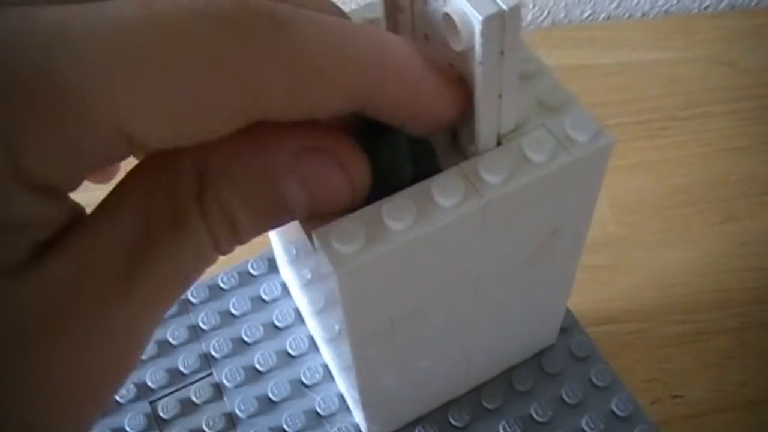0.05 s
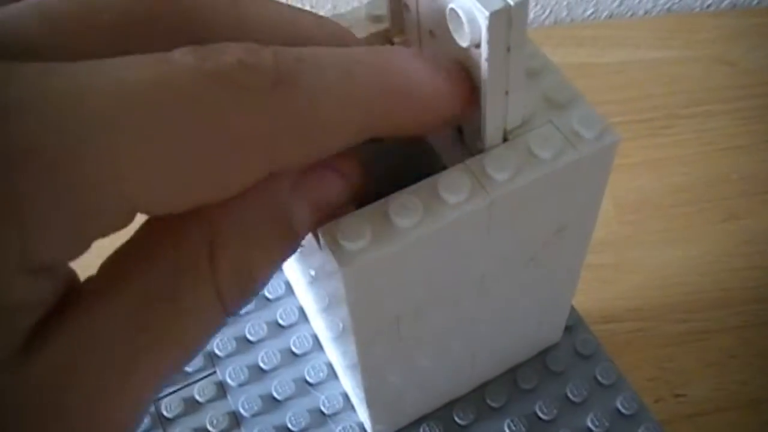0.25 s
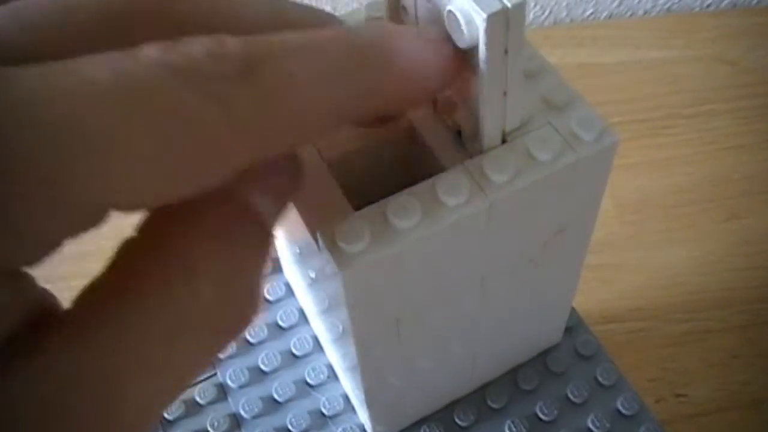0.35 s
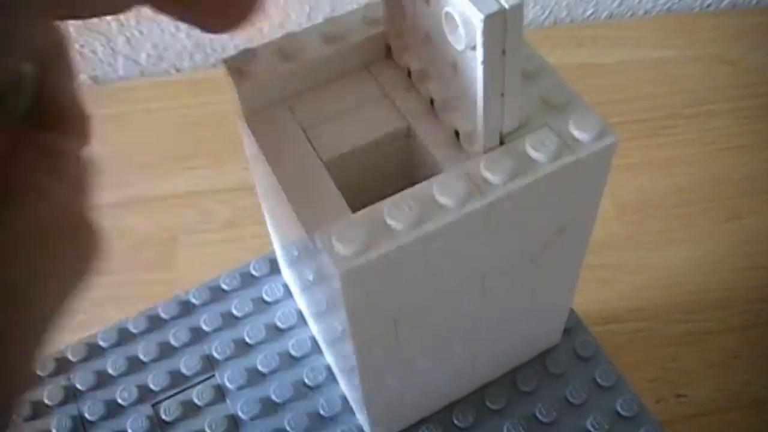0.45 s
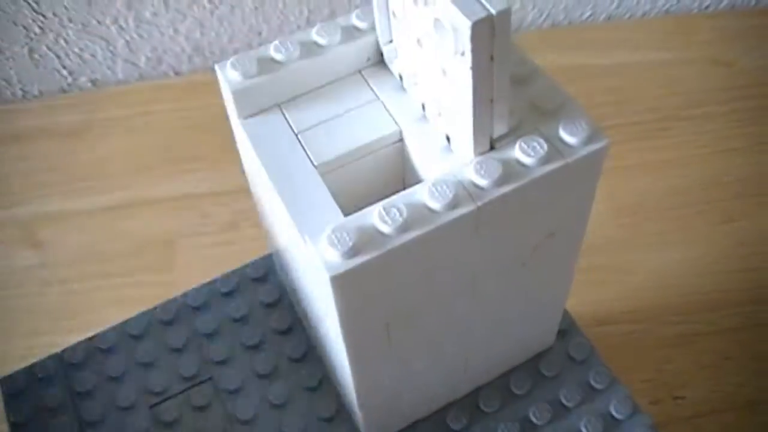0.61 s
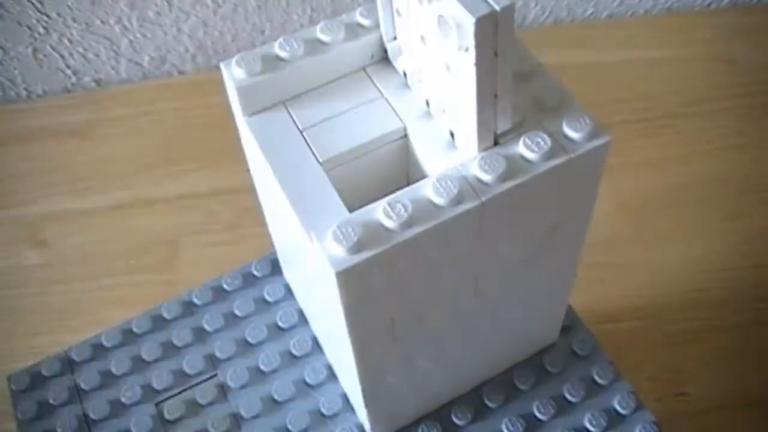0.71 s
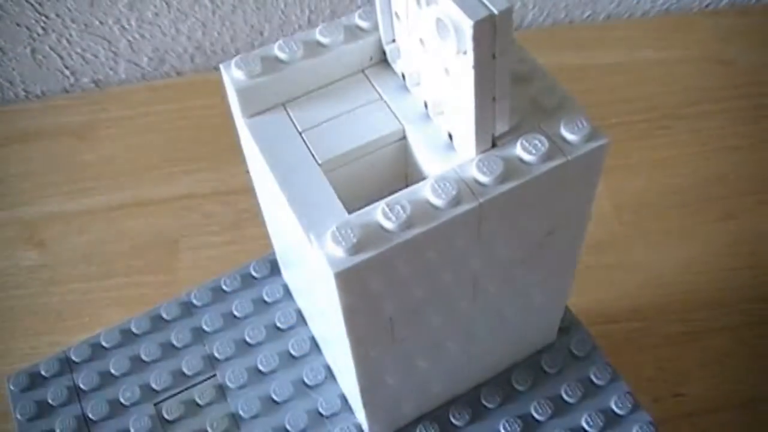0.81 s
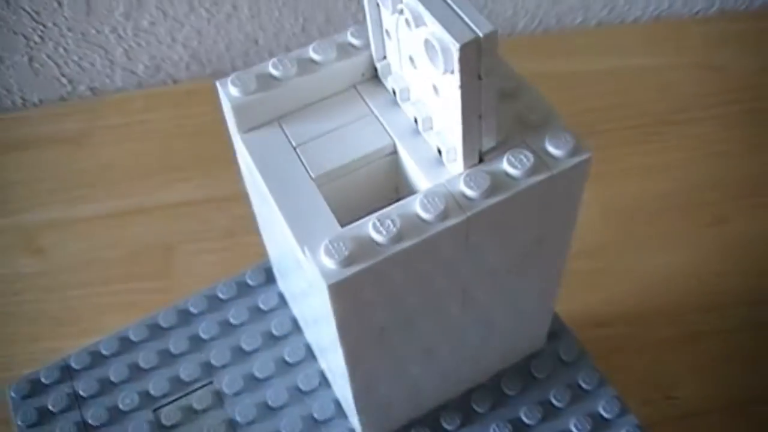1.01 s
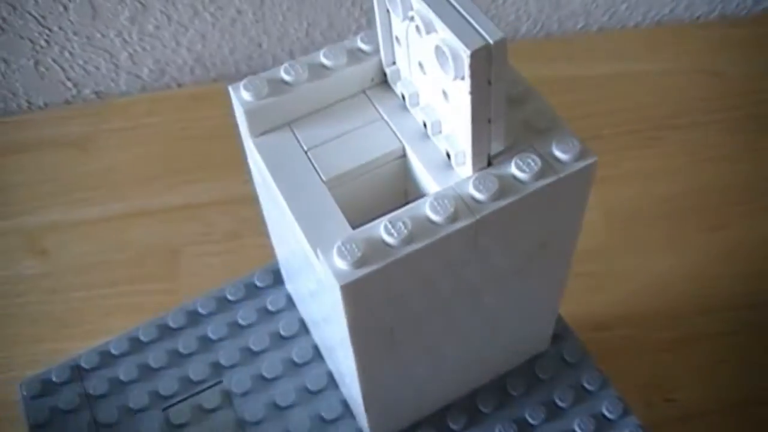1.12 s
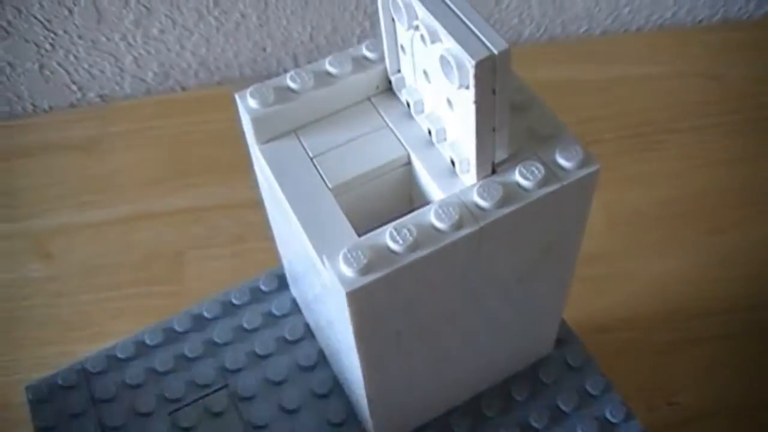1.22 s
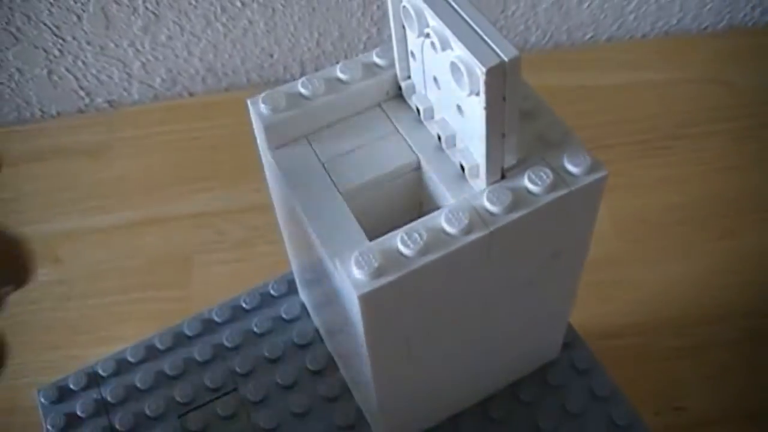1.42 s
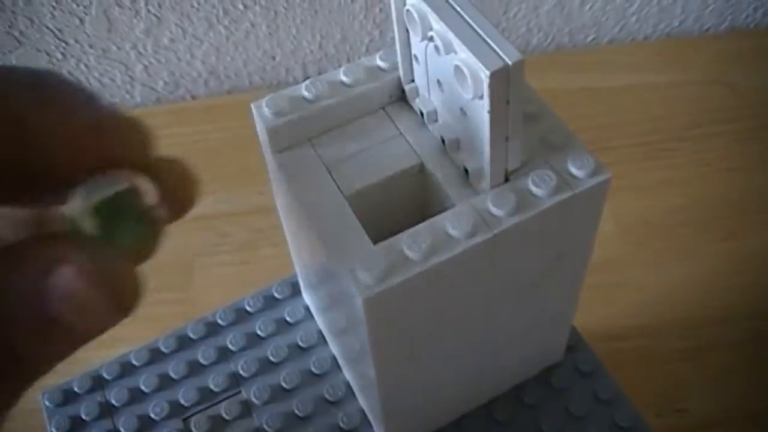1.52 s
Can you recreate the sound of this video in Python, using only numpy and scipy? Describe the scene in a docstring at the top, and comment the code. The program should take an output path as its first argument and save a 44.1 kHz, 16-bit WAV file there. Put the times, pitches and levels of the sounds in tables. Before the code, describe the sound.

Close up in a small indoor room, a small hard coin ticks along a plastic edge, cracks free, bounces rapidly down a hollow shaft and settles, leaving a short room tail, soft hiss and low hum.

```python
"""Beside a toy machine of plastic bricks in a small quiet room, a coin is pushed through the slot, close by.
After a faint, soft knock it rubs and ticks along the slot's edges, snaps free, bounces down the hollow shaft
and settles. Contacts are shaped noise bands and short rings; ticks and knocks also ring the hollow box.
Every contact gets a tail of fading noise for the room; steady noise and two sines make the hiss and mains hum.
"""
import sys
import numpy as np
from scipy import signal
from scipy.fft import rfft, irfft, next_fast_len
from scipy.io import wavfile
from scipy.ndimage import uniform_filter1d, map_coordinates

SR = 44100
rng = np.random.default_rng(int(sys.argv[2]) if len(sys.argv) > 2 else 0)


def dump_mix(stems):
    """Bounce the given channels to the path in sys.argv[1] as a 16-bit WAV at rate SR."""
    frames = np.atleast_2d(stems).T  # one column per channel
    limited = np.clip(frames, -1, 1)  # hard clip at full scale
    pcm = np.round(limited * 32767).astype(np.int16)
    wavfile.write(sys.argv[1], SR, pcm)


N = 68355  # length of the scene in samples

# Where the four force levels of a contact (thud, body, clack, click) lie: (frequency [Hz])
CONTACT_HZ = (400, 1200, 3000, 8000)
# Colour of the bricks' dense clatter at the slot: (frequency [Hz], level [dB])
SLOT_COLOUR = [(120, -12), (230, -7), (380, 2.5), (900, -5.5), (1800, -1.5), (3200, 4), (5200, -0.5),
               (8000, 0.5), (10000, -8), (11300, -17), (12500, -30)]
RING_S, HEAD_S = .35, .01  # longest ring of a contact; its first moments, which set its level
SLOT_ATTACK_S, SHAFT_ATTACK_S = .0001, .00038  # rise time constants of the contacts


def amp(db):
    """Turn decibels into a gain."""
    return 10 ** (np.asarray(db) / 20)


def along(points, hz):
    """Read a curve of (frequency, value) points on a logarithmic frequency axis."""
    f, v = np.transpose(points)
    return np.interp(np.log(hz + 1), np.log(f + 1), v)


def filtered(x, response):
    """Multiply the spectrum of x by a gain that depends on frequency."""
    n = x.shape[-1]
    m = next_fast_len(n + 4096)  # spare room at the end
    gain = response(np.fft.rfftfreq(m, 1 / SR))
    return irfft(rfft(x, m) * gain, m)[..., :n]


def ring_time():
    """Give the time axis of one contact, in seconds."""
    return np.arange(int(RING_S * SR)) / SR


def struck(x, t60, attack):
    """Give x a quick rise and a decay of 60 dB in t60 seconds, with rms 1 over its first moments."""
    t = ring_time()
    y = x * amp(-60 * t / t60) * (1 - np.exp(-t / attack))
    power = np.mean(y[..., t < HEAD_S] ** 2, axis=-1, keepdims=True)
    return y / np.sqrt(power + 1e-20)


def blurred(hz, width_hz):
    """Make sines whose phases drift at random, as in loosely joined plastic."""
    t = ring_time()
    steps = rng.standard_normal((len(hz), len(t)))
    drift = np.cumsum(steps, axis=1) * np.sqrt(2 * np.pi * width_hz / SR)
    cycles = np.outer(hz, t) + rng.random((len(hz), 1))
    return np.sin(2 * np.pi * cycles + drift)


def add(track, s, sound):
    """Mix a sound into the track at s seconds."""
    i = int(round(s * SR))
    n = min(sound.shape[-1], N - i)
    track[:, i:i + n] += sound[:, :n]


def room_tone(rate=12):
    """Steady coloured noise makes faint hiss and rumble; two sines make a wavering mains hum."""
    # colour of the room's noise: (frequency [Hz], level [dB])
    air_colour = [(15, -47.5), (25, -33), (60, -22.5), (90, -19.5), (120, -6), (160, -10), (240, -11),
                  (330, -17), (550, -22.5), (800, -24), (1200, -31), (2200, -33), (3500, -36.5),
                  (5300, -39.5), (7700, -38.5), (9500, -45), (11400, -53.5), (13000, -73.5)]
    # how wide that noise is: (frequency [Hz], side over mid [dB])
    air_side = [(60, -16.5), (300, -3.5), (1500, 2.5), (8000, -3.5)]
    # tones of the hum: (frequency [Hz], level [dB])
    hum_tones = [(119.8, -59), (239.6, -75.5)]
    air_db, hum_waver_db = -59, 1.2
    t = np.arange(N) / SR

    def air_gain(f):
        return amp(along(air_colour, f) + np.array([0 * f, along(air_side, f)]))

    mid, side = filtered(rng.standard_normal((2, N)), air_gain)
    air = amp(air_db) * np.array([mid + side, mid - side]) / mid.std()
    # a smooth curve through random points, 'rate' of them per second
    waver = map_coordinates(rng.standard_normal(256), [t * rate], mode="wrap")
    hum = sum(amp(db) * np.sqrt(2) * np.sin(2 * np.pi * (hz * t + rng.random())) for hz, db in hum_tones)
    return air + hum * amp(hum_waver_db * waver)


def flicker(x):
    """Random gains, smooth in time and pitch, make the sound swell and fade in patches, most in the treble."""
    patchy_db, full_from_hz = 1.7, 2500
    hz, t, z = signal.stft(x, SR, nperseg=512)
    field = rng.standard_normal(z.shape[1:])
    field = uniform_filter1d(field, size=12, axis=0)  # smooth across pitch
    field = uniform_filter1d(field, size=9, axis=1)  # smooth across time
    depth = patchy_db * np.minimum(hz / full_from_hz, 1)[:, None]
    return signal.istft(z * amp(depth * field / field.std()), SR, nperseg=512)[1][:, :N]


def in_room(x):
    """Spread a contact over left and right; noise that decays at each pitch's own rate is its room tail."""
    # decay time of the room: (frequency [Hz], time to fall 60 dB [s])
    room_t60 = [(150, 0.37), (600, .38), (1300, 0.42), (2500, 0.43), (5000, 0.49), (10000, 0.33)]
    # how much sound goes into the room: (frequency [Hz], level [dB])
    room_send = [(150, -9.5), (600, -7.5), (1500, -11.5), (3000, -16), (6000, -15.5), (11000, -15)]
    # how wide the direct sound is: (frequency [Hz], side over mid [dB])
    direct_side = [(200, -33), (1500, -15.5), (4000, -21), (10000, -8.5)]
    room_delay_s, room_side_db, port_spread_s = .006, -12.5, .0003
    size, time = len(x), ring_time()

    hz, t, z = signal.stft(rng.standard_normal((2, size)), SR, nperseg=256)
    t60 = along(room_t60, hz)[:, None]
    decay = amp(along(room_send, hz)[:, None] - 60 * t / t60)
    gain = decay * np.sqrt(2 * np.log(1000) / (t60 * SR))  # a long tail gets no extra energy
    tail = signal.istft(z * gain, SR, nperseg=256)[1][:, :size]
    tail = tail * (1 - np.exp(-(time / room_delay_s) ** 2))  # the room answers a little late
    wet, wide = signal.fftconvolve(x[None], tail, axes=1)[:, :size]

    # a very short burst of noise makes the direct sound differ between the two sides
    spread = rng.standard_normal(size) * np.exp(-time / port_spread_s)
    near = signal.fftconvolve(x, spread / np.linalg.norm(spread))[:size]
    mid = x + wet
    side = amp(room_side_db) * wide + filtered(near, lambda f: amp(along(direct_side, f)))
    return np.array([mid + side, mid - side])


def clatter(noise, force, colour, t60, attack, count=44):
    """Bands of noise, each with its own level and decay, stand for the many short rings of the bricks."""
    knee = 500  # Hz; bands are spaced more evenly below this
    low_cut_hz = 170  # Hz; the clatter is thinned below this
    hz = np.geomspace(120 + knee, 12300 + knee, count) - knee
    step = np.log((hz[1] + knee) / (hz[0] + knee))

    def band_gain(f):
        distance = np.log((f + knee) / (hz[:, None] + knee)) / step
        return np.cos(np.pi / 2 * np.clip(distance, -1, 1)) ** 2

    bands = struck(filtered(noise, band_gain), along(t60, hz)[:, None], attack)
    ring = amp(along(force, hz) + along(colour, hz) - 8.5) @ bands
    return signal.sosfilt(signal.butter(2, low_cut_hz, "high", fs=SR, output="sos"), ring)


def box(force, attack):
    """The hollow box rings at its own pitches, a little differently at each contact."""
    # rings of the box: (frequency [Hz], level [dB], time to fall 60 dB [s])
    box_modes = [(396, -16.5, 0.043), (474, -10, .22), (605.2, -6, 0.29), (633, -3, .24), (671.7, -1, 0.15),
                 (857.5, -8.5, 0.24), (1019, -8.5, .14), (1205, -12.5, 0.15), (1226.6, -9, 0.13),
                 (1376, -6.5, 0.051), (1941, -8.5, 0.12), (2143, -9, 0.17), (2560, -11, .12),
                 (2675, -14, .12)]
    scatter_db, blur_hz = 1.5, 6
    hz, db, t60 = np.transpose(box_modes)
    scatter = scatter_db * rng.standard_normal(len(hz))
    return amp(along(force, hz) + db + scatter) @ struck(blurred(hz, blur_hz), t60[:, None], attack)


def slide():
    """The coin rubs along the slot ever harder: tiny random slips of friction, filtered, make a murmur."""
    # colour of the rubbing: (frequency [Hz], level [dB])
    slide_colour = [(150, -20), (280, -4.5), (390, 8), (520, -11), (660, -6), (850, -17), (1400, -6),
                    (2100, -16), (3500, -37.5), (9000, -30.5), (13000, -58.5)]
    start_s, end_s, level_db, rise_db = .205, .34, -50.5, 5.5
    slips_per_s = 600
    out, t = np.zeros((2, N)), ring_time()
    slips = rng.standard_normal(len(t)) * (rng.random(len(t)) < slips_per_s / SR)
    rub = filtered(slips, lambda f: amp(along(slide_colour, f)))
    progress = t / (end_s - start_s)
    fade = np.clip(20 * np.minimum(progress, 1 - progress), 0, 1)  # short fades at both ends
    pressure = amp(level_db + rise_db * progress) * fade
    add(out, start_s, in_room(pressure * rub / rub.std()))
    return out


def slot():
    """A faint, soft knock dies away; then the coin catches on the slot in hard ticks, all with two short rings."""
    # soft knock, then catches: (time [s], thud [dB], body [dB], clack [dB], click [dB],
    #                            low ring [Hz], its level [dB], high ring [Hz], its level [dB])
    contacts = [(.002, -55, -67.5, -76, -78, 480, -61, 700, -63),
                (.0812, -50, -56, -53, -59.5, 630, -47, 2680, -55.5),
                (.2025, -47.5, -50, -56, -53.5, 2150, -45.5, 4280, -45),
                (.2306, -51.5, -48, -44.5, -53.5, 1800, -44, 6300, -50),
                (.2522, -48, -49, -49.5, -46, 4000, -40, 6400, -46.5),
                (.2727, -50, -40.5, -50, -46, 3165, -35.5, 6450, -45.5),
                (.2875, -57, -41, -55, -58, 1864, -39, 9400, -57),
                (.2973, -47, -41.5, -48, -45.5, 2170, -37.5, 6900, -48.5),
                (.3065, -45.5, -37.5, -48.5, -51.5, 660, -41, 3950, -44),
                (.3157, -58, -34.5, -39, -51.5, 2157, -29.5, 3100, -33.5),
                (.3248, -55, -46, -42, -43.5, 2263, -38.5, 4700, -39),
                (.3345, -37, -42, -57, -55.5, 1850, -42, 2700, -48),
                (.3402, -45, -40, -41, -47.5, 940, -32.5, 2900, -39.5),
                (.3705, -40, -33.5, -37.5, -31.5, 3254, -31, 3550, -36.5)]
    # decay of the clatter: (frequency [Hz], time to fall 60 dB [s])
    slot_t60 = [(300, 0.042), (1500, 0.09), (3500, 0.026), (9000, .012)]
    edge_t60_s, edge_blur_hz, box_db = .025, 60, -3.5
    out, t = np.zeros((2, N)), ring_time()
    for s, *levels, low_hz, low_db, high_hz, high_db in contacts:
        force = list(zip(CONTACT_HZ, levels))
        contact = clatter(rng.standard_normal(len(t)), force, SLOT_COLOUR, slot_t60, SLOT_ATTACK_S)
        tones = struck(blurred([low_hz, high_hz], edge_blur_hz), edge_t60_s, SLOT_ATTACK_S)
        two_rings = amp([low_db, high_db]) @ tones
        add(out, s, in_room(contact + two_rings + amp(box_db) * box(force, SLOT_ATTACK_S)))
    return out


def snap():
    """The coin springs free: a single smooth pulse is the push of air, a burst of clatter the dry crack."""
    # strength of the crack: (frequency [Hz], level [dB])
    crack_force = [(400, -39.5), (1200, -31.5), (3000, -33.5), (5500, -39.5), (8500, -25.5)]
    # decay of the crack: (frequency [Hz], time to fall 60 dB [s])
    crack_t60 = [(300, 0.057), (1500, 0.054), (3500, 0.02), (9000, 0.012)]
    snap_s, push_db, push_width_s, push_left_db = .34293, -8.5, .00012, .3
    crack_attack_s = .00005
    room_share = amp(-10.5)  # the crack sends less into the room than the other contacts
    out, t = np.zeros((2, N)), ring_time()
    push = amp(push_db) * np.exp(-((t - HEAD_S) / push_width_s) ** 2)
    crack = clatter(rng.standard_normal(len(t)), crack_force, SLOT_COLOUR, crack_t60, crack_attack_s)
    add(out, snap_s - HEAD_S, push * amp([[push_left_db], [-push_left_db]]))  # peaks at snap_s
    add(out, snap_s, in_room(room_share * crack) + (1 - room_share) * crack)
    return out


def wall(db):
    """The shaft's wall gives a short, bright clack: a few sines that die at once."""
    # rings of the wall: (frequency [Hz], level [dB], time to fall 60 dB [s])
    wall_modes = [(2638, -6, 0.037), (2842, -2.5, 0.013), (3060, -15.5, 0.018)]
    attack_s = .0009
    hz, level, t60 = np.transpose(wall_modes)
    tones = np.sin(2 * np.pi * hz[:, None] * ring_time())
    return amp(db + level) @ struck(tones, t60[:, None], attack_s)


def shaft():
    """The coin bounces between the same walls, so its hollow knocks are alike; the base plate thumps."""
    # bounces: (time [s], thud [dB], body [dB], clack [dB], click [dB], base plate [dB], wall ring [dB])
    knocks = [(.4025, -50, -43.5, -56, -67, -56.5, -48), (.4224, -33, -30.5, -36.5, -44.5, -71, -51),
              (.4545, -44, -27.5, -35.5, -37, -46.5, -44), (.4706, -35.5, -28, -35.5, -42.5, -53, -24.5),
              (.4812, -35, -41.5, -44, -43, -48, -56.5), (.4920, -48.5, -35, -44, -48.5, -56, -52),
              (.5146, -36, -29.5, -41.5, -44, -57, -29), (.5385, -46, -58, -73, -56, -53, -69),
              (.5462, -40, -30.5, -37, -44, -52.5, -32.5), (.5668, -44, -33, -37.5, -49.5, -58, -37),
              (.5810, -43, -41.5, -44.5, -56.5, -56, -47), (.5905, -47.5, -48, -52, -59, -59, -48),
              (.6030, -69, -51, -56, -70, -57, -62), (.7820, -61.5, -62, -90, -110, -74, -95)]
    # hollower colour of the clatter inside the shaft: (frequency [Hz], level [dB])
    shaft_colour = [(120, -16), (220, -19.5), (330, -5), (480, 2.5), (900, -1.5), (1330, 3), (1700, -4),
                    (2050, 5), (2400, -1.5), (2800, 2.5), (3400, -2.5), (3950, 0), (4400, -2.5),
                    (4800, -0.5), (6200, -4), (7500, 4), (9000, -4), (10500, -9), (12500, -36)]
    # decay of that clatter: (frequency [Hz], time to fall 60 dB [s])
    shaft_t60 = [(300, 0.08), (1500, 0.027), (3500, 0.0357), (9000, .018)]
    # colour of the base plate's thump: (frequency [Hz], level [dB])
    thump_colour = [(30, -23), (60, -27), (100, -8.5), (190, 21), (300, -15.5), (600, -35), (2000, -82)]
    thump_t60_s, thump_attack_s, box_db = .11, .0041, -2.5
    alike = .81  # share of the clatter's power that is the same from bounce to bounce
    out, size = np.zeros((2, N)), len(ring_time())
    same_walls = rng.standard_normal(size)
    for s, *levels, thump_db, wall_db in knocks:
        force = list(zip(CONTACT_HZ, levels))
        noise = np.sqrt(alike) * same_walls + np.sqrt(1 - alike) * rng.standard_normal(size)
        knock = clatter(noise, force, shaft_colour, shaft_t60, SHAFT_ATTACK_S)
        plate = filtered(rng.standard_normal(size), lambda f: amp(along(thump_colour, f)))
        thump = amp(thump_db) * struck(plate, thump_t60_s, thump_attack_s)
        ring = amp(box_db) * box(force, SHAFT_ATTACK_S)
        add(out, s, in_room(knock + wall(wall_db) + thump + ring))
    return out


def scene():
    """Sum the room and the coin's sounds, all slightly left of centre."""
    left_db = .27  # left is raised and right is lowered by this much
    background = flicker(room_tone())
    coin = slide() + slot() + snap() + shaft()
    return (background + coin) * amp([[left_db], [-left_db]])


def record(dry):
    """Cut the sound off very steeply above the band limit."""
    top_hz = 12700
    return filtered(dry, lambda hz: 1 / np.sqrt(1 + (hz / top_hz) ** 120))


dry = scene()
out = record(dry)
dump_mix(out)
```